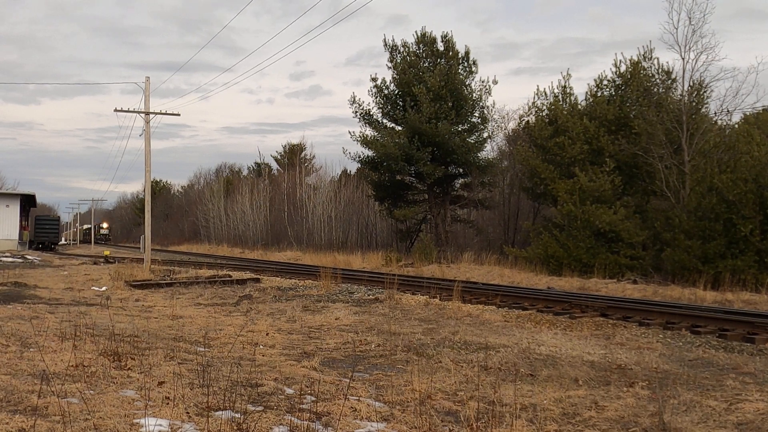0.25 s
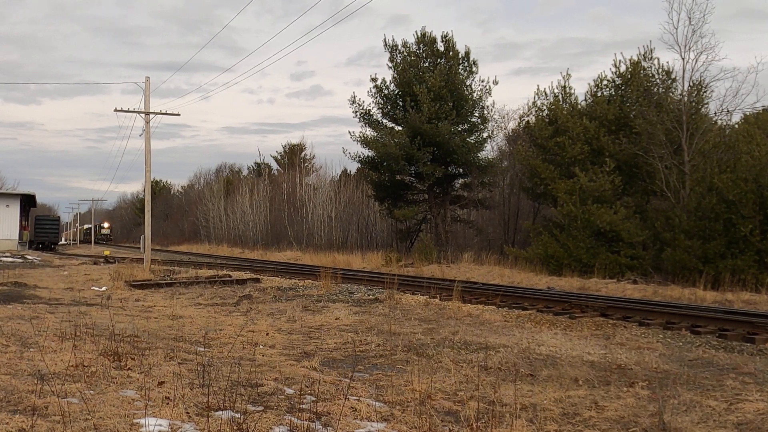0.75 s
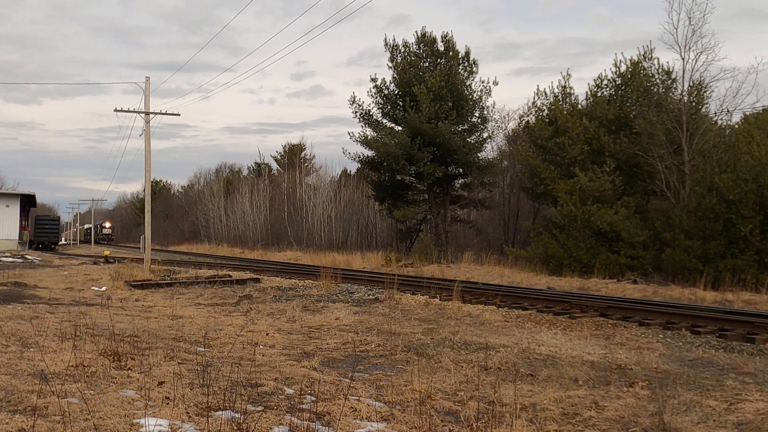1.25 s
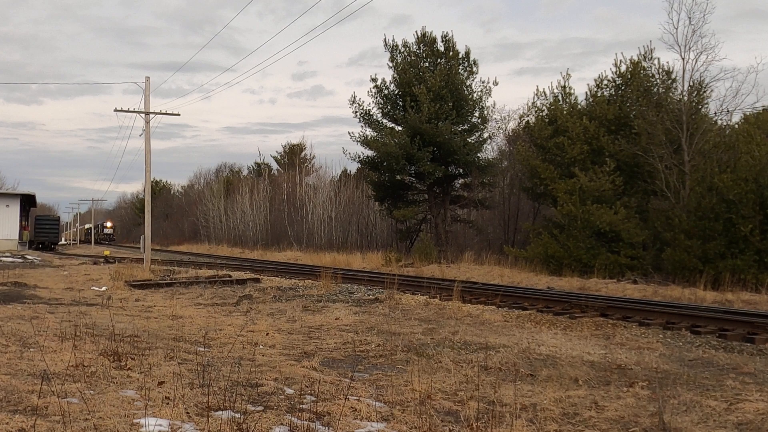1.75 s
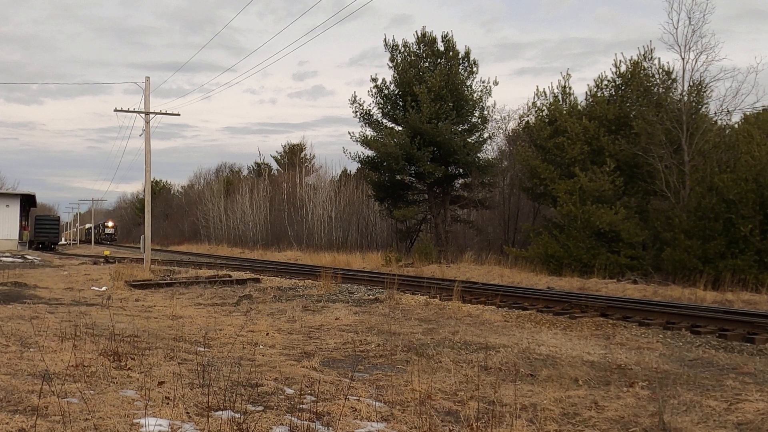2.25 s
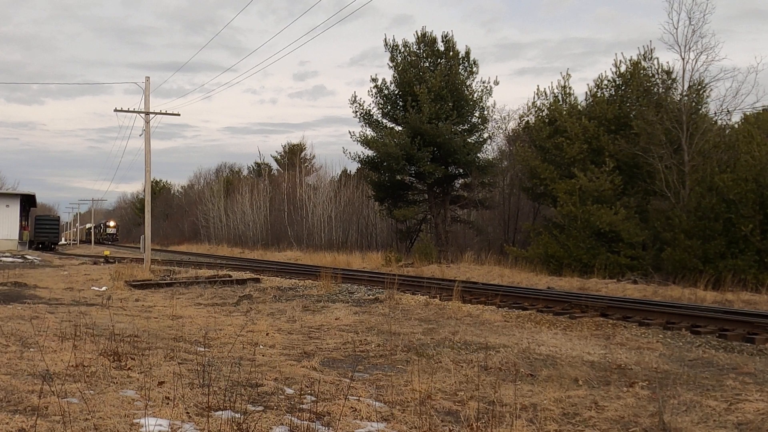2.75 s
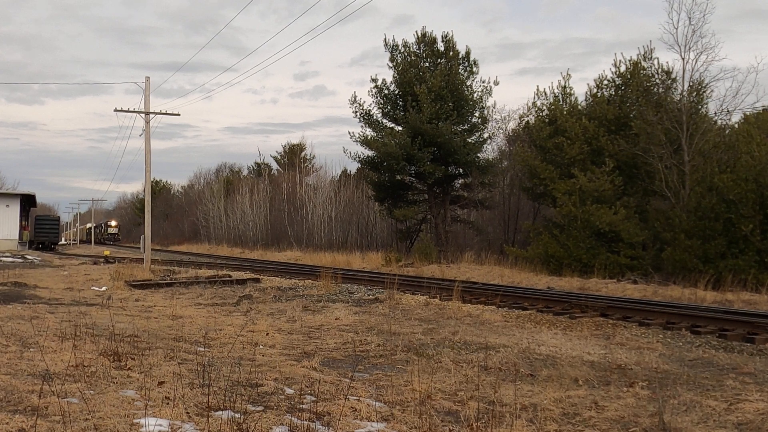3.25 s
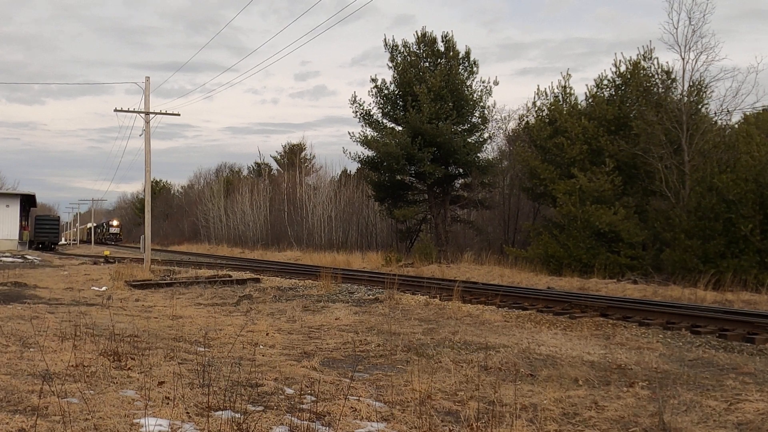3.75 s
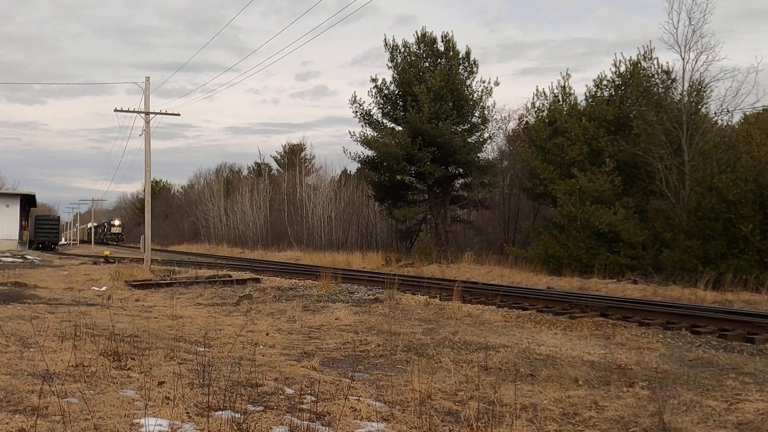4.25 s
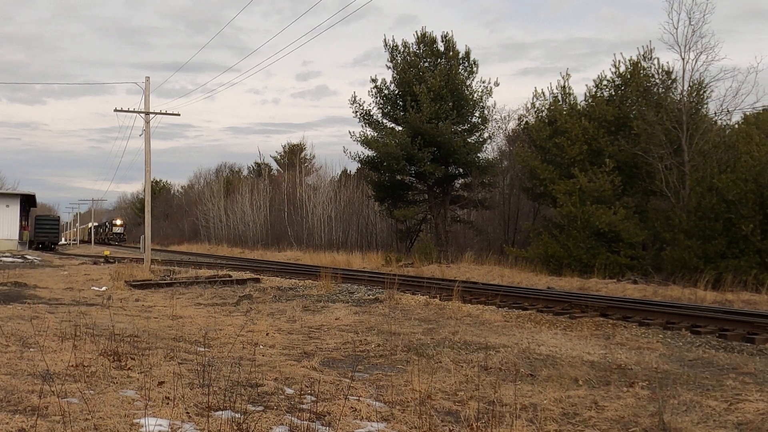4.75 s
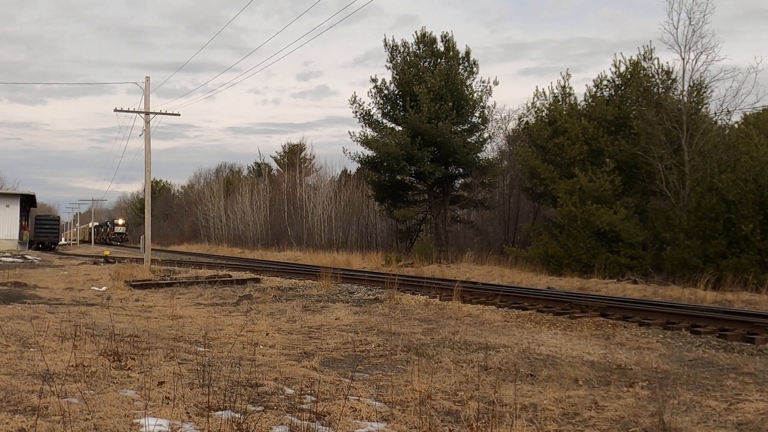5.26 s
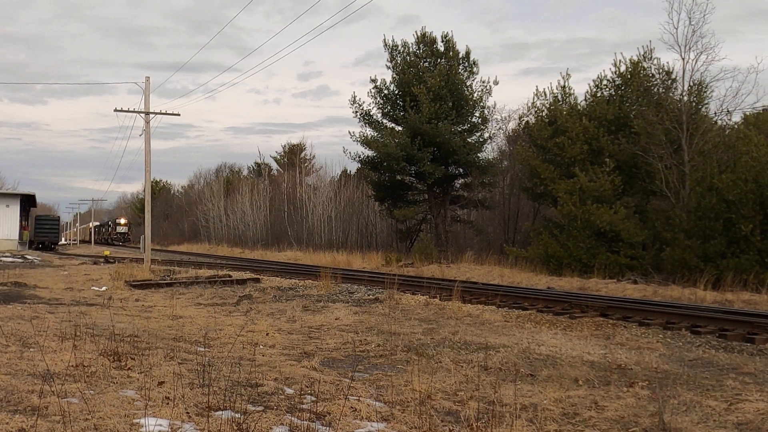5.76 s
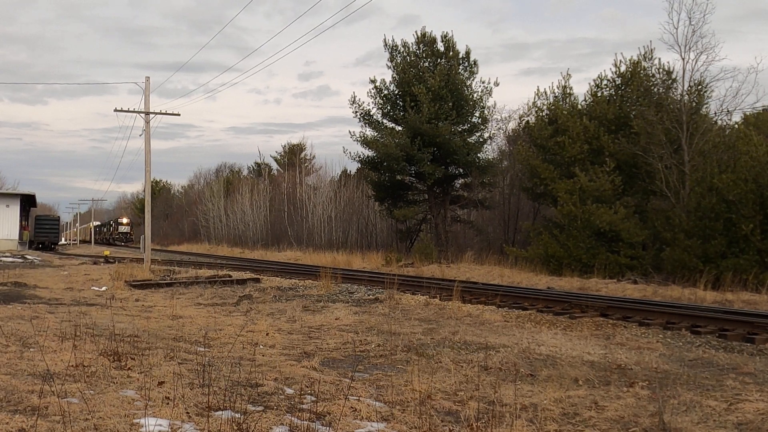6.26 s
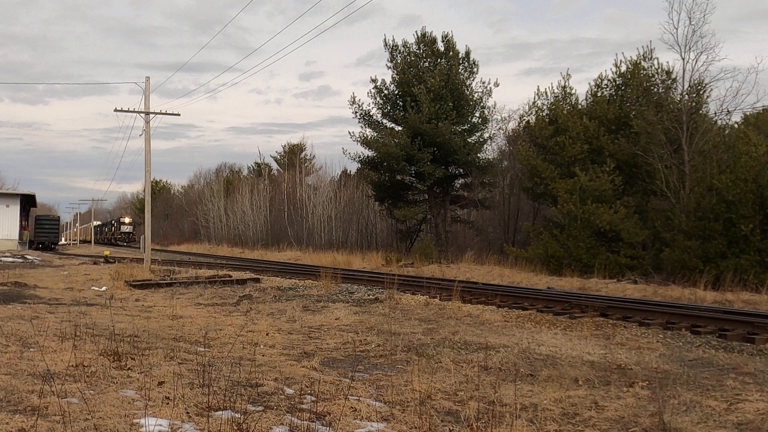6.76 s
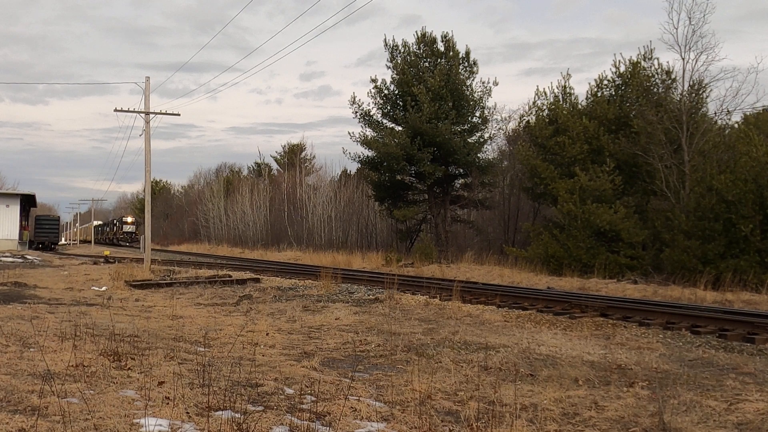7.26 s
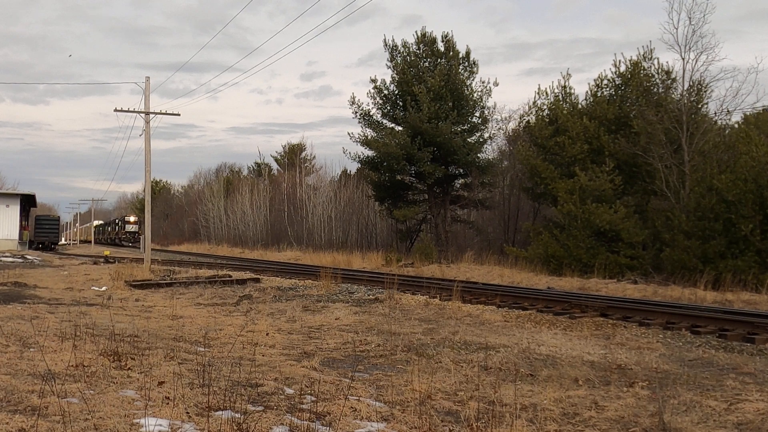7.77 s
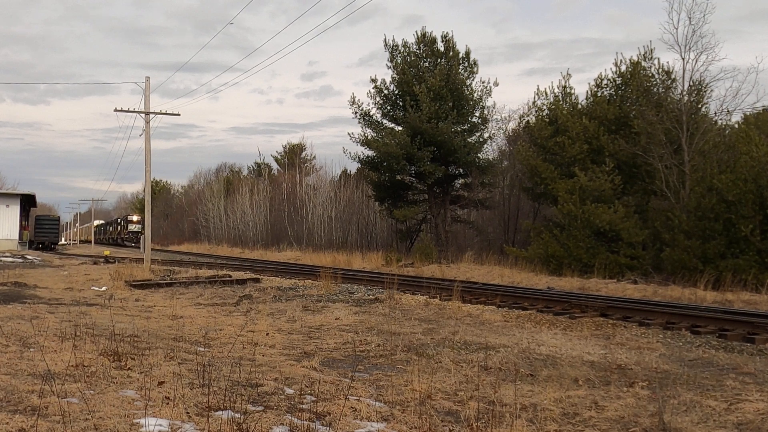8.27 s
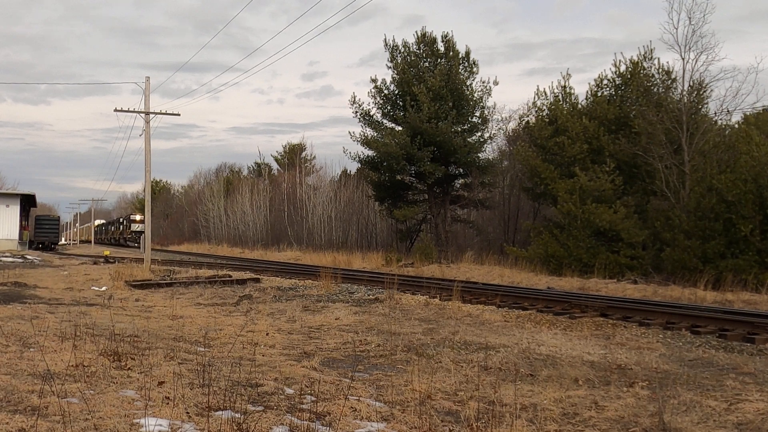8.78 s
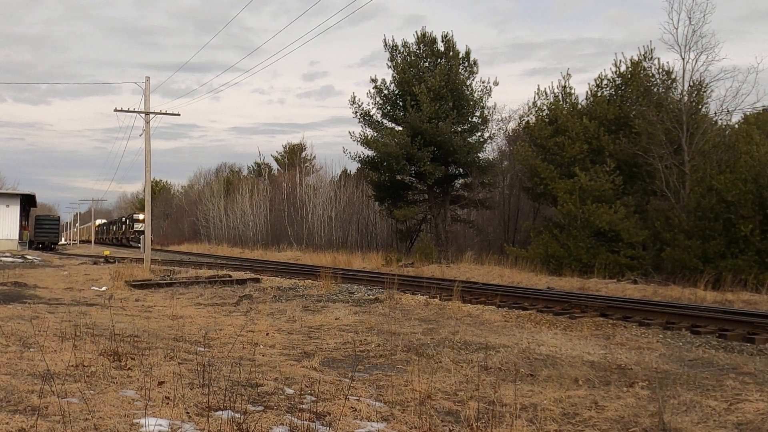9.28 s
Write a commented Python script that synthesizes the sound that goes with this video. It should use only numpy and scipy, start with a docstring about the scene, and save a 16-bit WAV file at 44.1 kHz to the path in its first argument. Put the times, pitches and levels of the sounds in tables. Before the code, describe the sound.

A heavy low engine drone beats unevenly as a train slowly approaches outdoors, climbing slightly in pitch midway while dry grass crackles nearby.

```python
"""Three diesel locomotives haul a train nearer over a field; their exhaust notes beat at unequal speeds.
From the start the stacks rumble and hiss in puffs, fans and wheels roar as filtered noise, a drone holds.
A small bird whistles in gliding sines at 0.1-0.6 s and 4.5-4.9 s; dry grass rustles from 0.9 s in grains
and ticks from 2.3 s in noise bursts. The throttles open one notch between 4.9 and 5.7 s: the notes climb
and the roar fills out; stack resonances swell at their own moments, faint fan whines come and go."""
import sys
import numpy as np
from scipy import signal
from scipy.io import wavfile

SR = 44100
rng = np.random.default_rng(int(sys.argv[2]) if len(sys.argv) > 2 else 0)


def persist_wave(psi):
    """Save psi, clipped to +-1, as 16-bit WAV."""
    counts = np.round(np.clip(psi, -1, 1) * 32767).astype(np.int16)
    wavfile.write(sys.argv[1], SR, np.atleast_2d(counts).T)


N = 419832


def from_db(db):
    """Decibels to gain."""
    return 10 ** (np.asarray(db) / 20)


def rms_one(x):
    """Scale to unit power."""
    return x / np.sqrt(np.mean(np.abs(x) ** 2) + 1e-20)


def ease(u):
    """Raised-cosine step from 0 to 1."""
    return (1 - np.cos(np.pi * np.clip(u, 0, 1))) / 2


def level_curve(rows):
    """Level in dB at every sample, interpolated between (s, dB) points."""
    s, db = np.transpose(rows)
    return np.interp(np.arange(N) / SR, s, db)


def swells(rows):
    """Sum of Gaussian rises and dips; rows of (centre s, half width s to 1/e, height)."""
    t = np.arange(N) / SR
    return sum(height * np.exp(-((t - s) / width_s) ** 2) for s, width_s, height in rows)


def at_hz(points, hz):
    """Read a spectrum on a log-frequency axis."""
    points_hz, values = np.array(points).T
    return np.interp(np.log(hz), np.log(points_hz), values)


def drift(rate_hz):
    """Slow random wander of unit power: noise through two equal poles, at 1/100 of the sample rate."""
    r = np.exp(-200 * np.pi * rate_hz / SR)
    white = rng.standard_normal(N // 100 + 2002)
    slow = signal.lfilter([1], [1, -2 * r, r * r], white)[2000:]  # drop the filter's start-up
    return np.interp(np.arange(N) / 100, np.arange(len(slow)), rms_one(slow))


def resonate(x, hz, width_hz):
    """Two-pole resonance, gain of one at its top."""
    r = np.exp(-np.pi * width_hz / SR)
    zeros = np.array([1, 0, -1]) * (1 - r * r) / 2
    poles = [1, -2 * r * np.cos(2 * np.pi * hz / SR), r * r]
    return signal.lfilter(zeros, poles, x)


def resonate_thrice(x, hz, width_hz):
    """Three equal resonances in series: steeper skirts."""
    for _ in range(3):
        x = resonate(x, hz, width_hz)
    return x


def noise_band(hz, width_hz, flow=1):
    """Turbulence through two equal resonances in series, at unit power."""
    noise = flow * rng.standard_normal(N)
    return rms_one(resonate(resonate(noise, hz, width_hz), hz, width_hz))


def through_air(x, hz):
    """The long path over the field takes off the treble in a smooth slope."""
    return signal.sosfilt(signal.butter(4, hz, fs=SR, output="sos"), x)


# Stereo likeness of the noise. Each row: frequency in Hz, left-right correlation (clipped to 1).
EAR_LIKENESS = [(300, 1.5), (600, 0.82), (1200, 0.88), (2200, 0.75), (4000, 0.8), (8000, 0.34)]
# Stereo balance of the noise. Each row: frequency in Hz, left minus right in dB.
EAR_BALANCE = [(60, 0.5), (98, 0.5), (160, 0.0), (260, 2.5), (420, 5.5), (690, -0.5), (1120, -0.5),
               (1820, 2.5), (2970, 3.5), (4840, 1)]


def open_air_noise(spectrum, patchy_db):
    """Third-octave bands of stereo noise, each fluttering in the moving air; least alike in the top treble."""
    edges_hz = 280 * 2 ** (np.arange(18) / 3)
    white = rng.standard_normal((2, 2, N))
    sides = np.array([[1], [-1]])
    out = 0
    for k, (low, high) in enumerate(zip(edges_hz, edges_hz[1:])):
        band_filter = signal.butter(3, [low, high], "band", fs=SR, output="sos")
        mid, side = signal.sosfilt(band_filter, white[k % 2])  # neighbouring bands use separate noise
        hz = np.sqrt(low * high)
        alike = np.clip(at_hz(EAR_LIKENESS, hz), -1, 1)
        band = np.sqrt(1 + alike) * mid + np.sqrt(1 - alike) * side * sides
        balance = from_db(sides * at_hz(EAR_BALANCE, hz) / 2)
        out = out + band * balance * from_db(at_hz(spectrum, hz) + patchy_db * drift(26))
    return rms_one(out)


SETTLE_S, RECOVER_S = 2.915, 1.538  # governor: settling on the low notch, recovery from overshoot


def crank_speed(run):
    """Turns per s: settles on the low notch, climbs when the throttle opens, overshoots and recovers."""
    start, low, high, opens_s, climb_s, overshoot = run
    t = np.arange(N) / SR
    cruise = start + (low - start) * ease(t / SETTLE_S)
    aim = high + overshoot * (1 - ease((t - opens_s - climb_s) / RECOVER_S))
    return cruise + (aim - cruise) * ease((t - opens_s) / climb_s)


def crank_angle(speed):
    """Angle of the crankshaft in radians."""
    return 2 * np.pi * np.cumsum(speed) / SR


FIRINGS = 8  # per crank turn
LOW_NOTCH, HIGH_NOTCH = 9.75, 11.25  # crank turns per s


def high_notch(speed):
    """Progress from the low to the high notch by engine speed, 0-1."""
    return np.clip((speed - LOW_NOTCH) / (HIGH_NOTCH - LOW_NOTCH), 0, 1)


def engine(speed, orders, level_db, notch_db, uneven, firing_uneven, lope_db=0, note_db=0, octave_db=0):
    """Eight firings a turn give the main note; unequal cylinders add other multiples of crank speed."""
    notch, angle, out = high_notch(speed), crank_angle(speed), 0
    for multiple, low_db, high_db in orders:
        order = round(multiple)
        db = low_db + notch * (high_db - low_db)
        db = db + note_db * (order == FIRINGS) + octave_db * (order == 2 * FIRINGS)
        if order % FIRINGS == 0:  # harmonics of the firing rate line up into puffs
            phase, waver = order * angle, firing_uneven * order / FIRINGS
        else:  # random phase, own waver; orders 6 and 10 make the note lope
            phase, waver = order * angle + rng.uniform(0, 2 * np.pi), uneven
            db = db + lope_db * (abs(order - FIRINGS) == 2)
        line = (1 + waver * drift(2.6)) * np.cos(phase) + waver * drift(2.2) * np.sin(phase)
        out = out + line * from_db(db) / np.sqrt(.5 + waver ** 2)
    return out * from_db(level_db + notch_db * notch)


# Speed of the leading engine. Values: starting speed, low-notch speed, high-notch speed in crank turns
# per s, throttle opening in s, climb in s, overshoot in turns per s.
LEAD_RUN = (9.651, 9.756, 11.199, 5.2, 1.381, .341)
# Leading exhaust. Each row: multiple of crank speed, relative level in dB at the low notch, at the high notch.
LEAD_EXHAUST = [(2, -33, -22), (3, -33.5, -23.5), (4, -21, -13), (5, -21, -17), (6, -14.5, -10),
                (7, -18.5, -16), (8, -1.03, -0.5), (10, -16, -17.5), (11, -27.5, -27), (12, -30.5, -30),
                (13, -28.5, -18), (14, -29.5, -14.5), (15, -34.5, -21), (16, -9.5, -15.5), (17, -19, -34.5),
                (18, -30.5, -15.5), (19, -21.5, -24), (20, -28, -18.5), (21, -30, -18), (22, -24.5, -26.5),
                (23, -18.5, -34.5), (24, -15, -27.5), (25, -23.5, -41), (26, -27.5, -27.5),
                (27, -30, -39.5), (29, -28.5, -35), (30, -36, -42), (33, -33, -34), (40, -34.5, -42)]
# Lope of the leading engine swelling and fading. Each row: centre in s, half width in s, gain in dB.
LEAD_LOPE_SWELLS = [(3.3, 0.7, -4.5), (4.9, 0.84, 10.5), (6.3, 0.4, 1.5), (7, .25, -7.5)]
# Leading firing note swelling and fading. Each row: centre in s, half width in s, gain in dB.
LEAD_NOTE_SWELLS = [(1.3, .5, 3.2), (2.6, .6, 3.5), (5.35, .2, 4.6), (5.56, .07, -9), (5.8, .17, 4.3),
                    (6.9, .4, -20), (7.45, .15, 3.5)]
# Octave above the firing note. Each row: centre in s, half width in s, gain in dB.
LEAD_OCTAVE_SWELLS = [(.7, 0.16, -5), (1.75, .3, 2), (6.2, .3, -8), (6.75, 0.14, 8)]


def lead_engine(speed):
    """Fullest exhaust spectrum; its lope, firing note and octave swell and fade separately."""
    return engine(speed, LEAD_EXHAUST, level_db=-21.0, notch_db=.8, uneven=.22, firing_uneven=.03,
                  lope_db=-0.7 + swells(LEAD_LOPE_SWELLS), note_db=swells(LEAD_NOTE_SWELLS),
                  octave_db=swells(LEAD_OCTAVE_SWELLS))


# Speed of the second engine. Values as for the leader: three speeds in crank turns per s, opening in s,
# climb in s, overshoot in turns per s.
SECOND_RUN = (9.83, 9.718, 10.95, 5.703, .609, .481)
# Second exhaust. Each row: multiple of crank speed, relative level in dB at the low notch, at the high notch.
SECOND_EXHAUST = [(4, -17.5, -12.5), (6, -16, -11.5), (8, -6, 2.5), (10, -10.5, -9), (16, -22.5, -18),
                  (20, -14, -16.5), (22, -16.5, -22.5), (24, -22.5, -23.5)]


def second_engine():
    """Its slightly different crank speed beats against the leader."""
    return engine(crank_speed(SECOND_RUN), SECOND_EXHAUST, level_db=-35.6, notch_db=11.8,
                  uneven=.35, firing_uneven=0.03)


# Speed of the third engine. Values as for the leader: three speeds in crank turns per s, opening in s,
# climb in s, overshoot in turns per s.
THIRD_RUN = (9.398, 9.286, 11.105, 4.861, 2.458, .333)
# Third exhaust. Each row: multiple of crank speed, relative level in dB at the low notch, at the high notch.
THIRD_EXHAUST = [(6, -16.5, -11), (8, -4.5, -2.5), (20, -1, -16), (24, -9, -29)]
# Firing note coming forward. Each row: centre in s, half width in s, gain in dB.
THIRD_NOTE_SWELLS = [(4.3, 1.3, 13.6)]


def third_engine():
    """Its firing note comes forward and beats against the leader."""
    return engine(crank_speed(THIRD_RUN), THIRD_EXHAUST, level_db=-41.5, notch_db=14,
                  uneven=.4, firing_uneven=0.03, note_db=swells(THIRD_NOTE_SWELLS))


def puffing(speed, firing_depth, turn_depth):
    """Gas flow swells with every firing and, less, with every turn of the leading engine."""
    angle = crank_angle(speed)
    return rms_one(1 + firing_depth * np.cos(FIRINGS * angle) + turn_depth * np.cos(angle))


# Exhaust stack resonances. Each row: frequency in Hz, width in Hz of each of two resonators, level in dB
# at the low notch, at the high notch (both before the swell), swell centre in s, swell gain in dB.
STACK_RESONANCES = [(111, 52, -42.5, -41.5, 6.4, 5), (180.4, 37, -43, -36, 7.9, 5.5),
                    (225.5, 48, -39.5, -35.5, 5.69, 7.5), (276.4, 52, -49, -45, 5.65, 9.5),
                    (383.3, 66, -53.5, -56.5, 5.9, 12), (495.4, 70, -52, -49.5, 4.4, -0.5)]
STACK_SWELL_S = 0.62  # half width


def exhaust_rumble(speed):
    """Puffs of gas ring in the stack resonances; most swell for a while, each at its own moment."""
    notch, flow = high_notch(speed), puffing(speed, firing_depth=.8, turn_depth=0.29)
    out = 0
    for hz, width_hz, low_db, high_db, s, swell_db in STACK_RESONANCES:
        db = low_db + notch * (high_db - low_db) + swells([(s, STACK_SWELL_S, swell_db)])
        out = out + from_db(db) * noise_band(hz, width_hz, flow)
    return out


# Upper hum. Each row: time in s, relative level in dB.
HUM_CURVE = [(0, -48.5), (.8, -44), (1.3, -47.5), (3.1, -46.5), (3.6, -41.5), (4.05, -41.5), (4.5, -46.5),
             (5.25, -41), (6, -44), (6.8, -46), (7.35, -43.5), (8.2, -47), (9.5, -45.5)]
HUM_ORDER = 37  # multiple of crank speed


def upper_hum(speed, hz, width_hz, tone_db, waver, flutter_db, gain_db):
    """Broad, wavering hum; where it swells at the low notch, one multiple of crank speed stands out."""
    hum_db = level_curve(HUM_CURVE)
    tone_db = tone_db + hum_db - hum_db.mean() + flutter_db * drift(1.8)
    tone = from_db(tone_db) * (1 - high_notch(speed))
    line = np.sqrt(2) * np.cos(HUM_ORDER * crank_angle(speed) + waver * drift(4))
    mix = (tone * line + noise_band(hz, width_hz)) / np.sqrt(1 + tone ** 2)
    return from_db(hum_db + gain_db) * mix


# Track bed rumble, one swell around 7.3 s. Each row: centre in s, half width in s, gain in dB.
TRACK_BED_SWELLS = [(7.3, 1, 4.5)]


def track_bed():
    """The track bed rumbles as a low noise band."""
    return from_db(-35.5 + swells(TRACK_BED_SWELLS)) * noise_band(hz=40.4, width_hz=60)


DRONE_HZ, DRONE_RMS_DB = 36.6, -34


def drone(waver_rad):
    """Steady sine of the auxiliaries; keeps its pitch whatever the throttle does."""
    phase = 2 * np.pi * DRONE_HZ * np.arange(N) / SR + waver_rad * drift(1.1)
    return from_db(DRONE_RMS_DB) * np.sqrt(2) * np.sin(phase)


DISTANCE_M, TRAIN_M_PER_S = 285, 13.6  # starting distance, steady approach


def nearness():
    """Gain of the approaching train: one over its distance, 1 at the start."""
    return DISTANCE_M / np.maximum(DISTANCE_M - TRAIN_M_PER_S * np.arange(N) / SR, 1)


# Roar before the air loss. Each row: frequency in Hz, relative density in dB per Hz.
ROAR_SPECTRUM = [(300, -1.5), (600, 1), (740, -4.5), (900, 1), (1150, 0), (1550, -1), (2000, -4.5),
                 (2800, -6.5), (4000, -11), (8000, -17.5)]
# Hood and fan duct resonances. Each row: frequency in Hz, width in Hz, gain in dB.
DUCT_RESONANCES = [(753, 55, 0), (1150, 46, -8), (1486, 330, -8.5), (3050, 150, -16)]
# Early ebb, then swell. Each row: centre in s, half width in s, gain in dB.
ROAR_EBB_AND_SWELL = [(2.3, .9, -1), (4, .7, .7)]


def fans_and_wheels(start_db):
    """Broad roar, coloured by the hoods and fan ducts, growing as the train nears."""
    noise = through_air(open_air_noise(ROAR_SPECTRUM, patchy_db=0.5), hz=2880)
    ducts = sum(from_db(db) * resonate(noise, hz, width_hz) for hz, width_hz, db in DUCT_RESONANCES)
    return from_db(start_db + swells(ROAR_EBB_AND_SWELL)) * nearness() * rms_one(noise + ducts)


# Hiss before the air loss. Each row: frequency in Hz, relative density in dB per Hz.
HISS_SPECTRUM = [(1000, -6), (2000, 1.5), (3000, 1.5), (5000, 2), (7800, 4), (9200, -2), (11000, -10)]
# Treble hiss. Each row: time in s, relative level in dB.
HISS_CURVE = [(0.2, -59), (0.46, -59.5), (1.1, -56.5), (1.9, -59.5), (2.5, -58), (2.9, -59), (4.24, -52.5),
              (4.63, -55), (5.85, -51), (6.3, -52.5), (6.93, -55), (7.12, -52.5), (8.23, -49),
              (8.51, -52.5), (9.5, -52.5)]


def stack_hiss(speed, sputter_db, gain_db):
    """Escaping gas hisses in puffs and sputters irregularly."""
    noise = rms_one(through_air(open_air_noise(HISS_SPECTRUM, patchy_db=1.0), hz=3630))
    puffs = puffing(speed, firing_depth=0.11, turn_depth=0.024)
    return noise * puffs * from_db(sputter_db * drift(42) + level_curve(HISS_CURVE) + gain_db)


# Bird calls. Each row: start in s, length in s, start in Hz, settled pitch in Hz, final rise in Hz, peak in dB.
BIRD_CALLS = [(.088, .025, 10200, 7600, 0, -69), (.255, .13, 9300, 8200, 0, -74),
              (.41, .09, 8500, 8100, 0, -79), (4.488, .05, 10400, 7450, 800, -57),
              (4.605, .13, 9400, 8150, 0, -73), (4.72, .15, 8350, 8170, 100, -73.5)]


def bird(settle, quaver_hz):
    """Thin whistles that drop quickly and settle; some flick up at the end."""
    out, quaver = np.zeros(N), quaver_hz * drift(90)
    for start_s, length_s, start_hz, end_hz, rise_hz, level_db in BIRD_CALLS:
        u = np.linspace(0, 1, int(length_s * SR))
        span = int(start_s * SR) + np.arange(len(u))
        glide_hz = end_hz + (start_hz - end_hz) * np.exp(-settle * u)
        hz = glide_hz + rise_hz * ease(2 * u - 1) ** 2 + quaver[span]
        out[span] += from_db(level_db) * np.sin(np.pi * u) * np.sin(2 * np.pi * np.cumsum(hz) / SR)
    return out


def among_trees(x, count, echo_db):
    """Branches return a few weak, early echoes that roughen a call."""
    lags = (rng.uniform(.003, .035, count) * SR).astype(int)
    return x + from_db(echo_db) * sum(np.pad(x, (lag, 0))[:N] for lag in lags)


# Spells of rustling. Each row: centre in s, half width in s, level in dB.
RUSTLE_SPELLS = [(.93, 0.11, -68), (2.5, 0.14, -68.5), (5.75, .2, -66.5), (7.95, .3, -64)]


def rustle(grains_per_s, spread_db, hz, width_hz):
    """Dry stalks brush together in short spells of fine grains."""
    sizes = from_db(spread_db * np.minimum(rng.exponential(1, (2, N)), 4))
    grains = sizes * (rng.random((2, N)) < grains_per_s / SR)
    envelope = sum(from_db(db) * swells([(s, width_s, 1)]) for s, width_s, db in RUSTLE_SPELLS)
    return envelope * noise_band(hz, width_hz, grains)


# Ticks of dry grass. Each row: start in s, level in dB before the decay, frequency in Hz,
# width in Hz of each of three resonators.
GRASS_TICKS = [(2.257, -53.5, 4900, 3200), (2.568, -62, 6000, 2500), (4.312, -51, 4300, 2000),
               (4.821, -47, 4200, 2000), (5.306, -56, 5000, 2500), (5.8, -59, 6500, 3000),
               (5.847, -56, 6500, 3000), (5.632, -49, 4200, 2000), (5.651, -46, 4400, 2200),
               (5.867, -57.5, 7560, 3750), (5.923, -50, 7300, 2200), (5.931, -57, 7400, 3000),
               (6.447, -59, 7900, 7000), (6.465, -52, 7300, 5500), (6.472, -55, 7400, 2500),
               (7.689, -45, 4600, 2200), (7.786, -61, 6500, 3500), (7.955, -52, 5000, 3000),
               (8.132, -53, 5200, 3000), (8.144, -54, 5500, 3000), (8.276, -45, 4200, 1800)]


def grass(decay_s):
    """Each tick is a short decaying burst of crackle with the colour of its stalk."""
    out, t = np.zeros(N), np.arange(SR // 20) / SR
    for s, level_db, hz, width_hz in GRASS_TICKS:
        crackle = rms_one(resonate_thrice(rng.standard_normal(len(t)), hz, width_hz))
        out[round(s * SR) + np.arange(len(t))] += from_db(level_db) * crackle * np.exp(-t / decay_s)
    return out


# Cooling fan whines. Each row: frequency in Hz, width in Hz of each of two resonators, peak level in dB,
# loudest at s, half width in s.
FAN_WHINES = [(714, 19, -52.5, 8.5, 0.26), (860, 13, -53.5, 8.4, 0.25), (893, 31, -58, 5.4, 0.76),
              (955, 13, -61.5, 6.7, 0.81)]


def fan_whine():
    """Faint wavering tones, narrow noise bands, that come and go."""
    return sum(from_db(db) * swells([(s, width_s, 1)]) * noise_band(hz, width_hz)
               for hz, width_hz, db, s, width_s in FAN_WHINES)


# Roar under load, one swell around 7.1 s. Each row: centre in s, half width in s, gain in dB.
LOAD_ROAR_SWELLS = [(7.1, 1, 7)]


def load_roar(speed, hz, width_hz, level_db, surge_db):
    """Under load the middle of the roar fills out and surges unevenly."""
    db = level_db + swells(LOAD_ROAR_SWELLS) + surge_db * drift(5.2)
    return from_db(db) * high_notch(speed) * noise_band(hz, width_hz)


def rail_hiss(speed, hz, width_hz):
    """Wheels sing faintly on the rails once the engines pull harder."""
    noise = resonate_thrice(rng.standard_normal((2, N)), hz, width_hz)
    return rms_one(noise) * high_notch(speed)


def scene():
    """The far train reaches both ears almost alike in the bass; the trees scatter a little of its rumble."""
    speed = crank_speed(LEAD_RUN)
    engines = lead_engine(speed) + second_engine() + third_engine()
    ground = track_bed() + drone(waver_rad=.3)
    hum = upper_hum(speed, hz=361.2, width_hz=56, tone_db=-1, waver=0.41, flutter_db=0.5, gain_db=1.5)
    bass = engines + exhaust_rumble(speed) + hum + ground
    scattered = from_db(-23.5) * exhaust_rumble(speed) * np.array([[1], [-1]])  # opposite at the two ears
    roar = fans_and_wheels(start_db=-45.5) + fan_whine()
    roar += load_roar(speed, hz=944, width_hz=450, level_db=-55, surge_db=1.0)
    roar += load_roar(speed, hz=1560, width_hz=260, level_db=-57.5, surge_db=1.5)
    hiss = stack_hiss(speed, sputter_db=1.3, gain_db=4.0)
    hiss += from_db(-72.0) * rail_hiss(speed, hz=6500, width_hz=2000)
    near = among_trees(bird(settle=4.5, quaver_hz=75), count=6, echo_db=-17)
    near += grass(decay_s=.005)
    near = near + rustle(grains_per_s=590, spread_db=3.5, hz=5200, width_hz=1500)
    return bass * from_db([[.25], [-.25]]) + scattered + roar + hiss + near


CUTOFF_HZ = 15400  # 70 dB down from here up


def record(dry):
    """The right microphone rolls off a little sooner in the bass, turning its phase; the top is cut steeply."""
    right = signal.sosfilt(signal.butter(1, 7.5, "high", fs=SR, output="sos"), dry[1])
    top_cut = signal.cheby2(12, 70, CUTOFF_HZ, fs=SR, output="sos")
    return signal.sosfilt(top_cut, np.array([dry[0], right]))


dry = scene()
out = record(dry)
persist_wave(out)
```